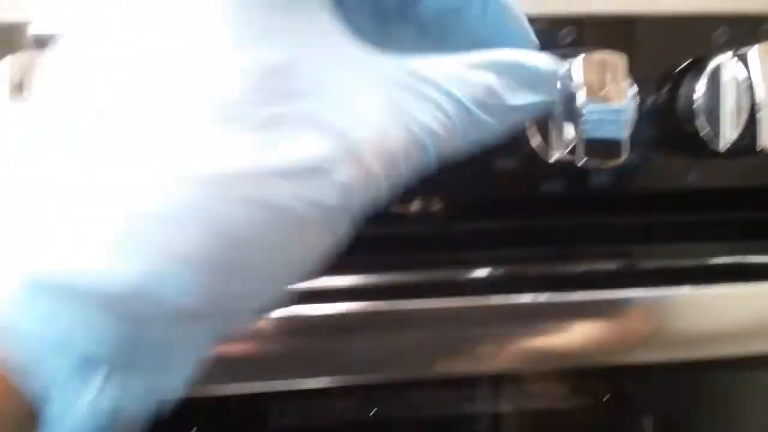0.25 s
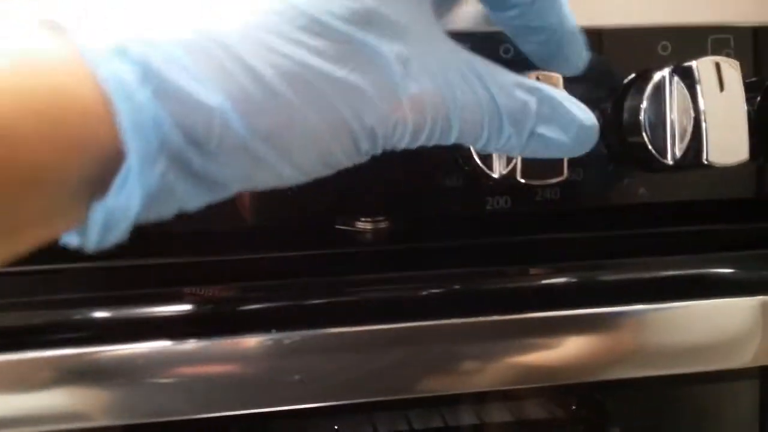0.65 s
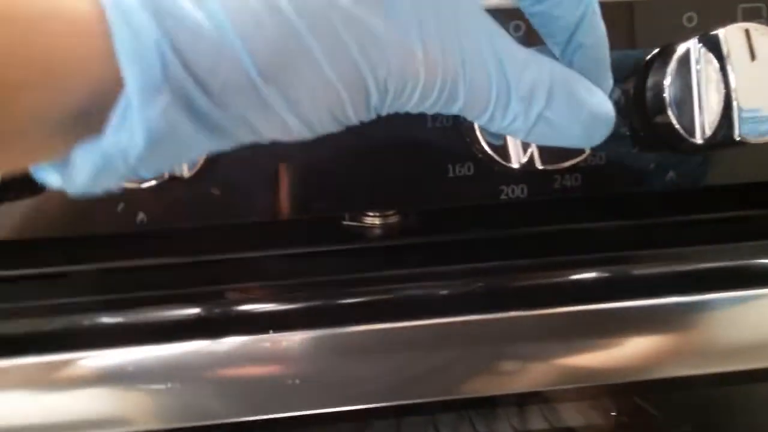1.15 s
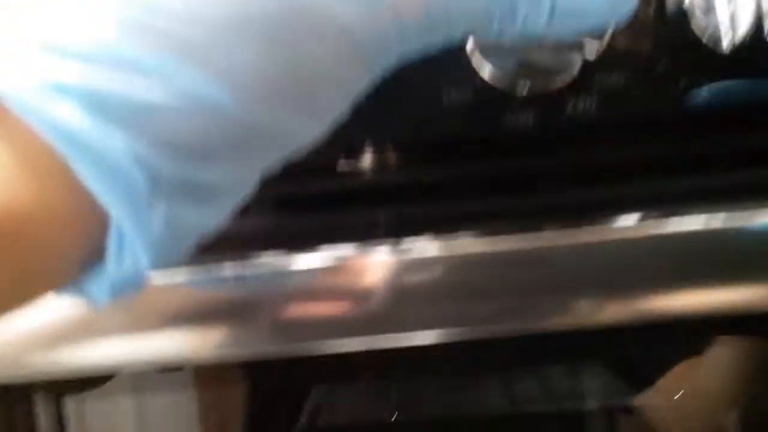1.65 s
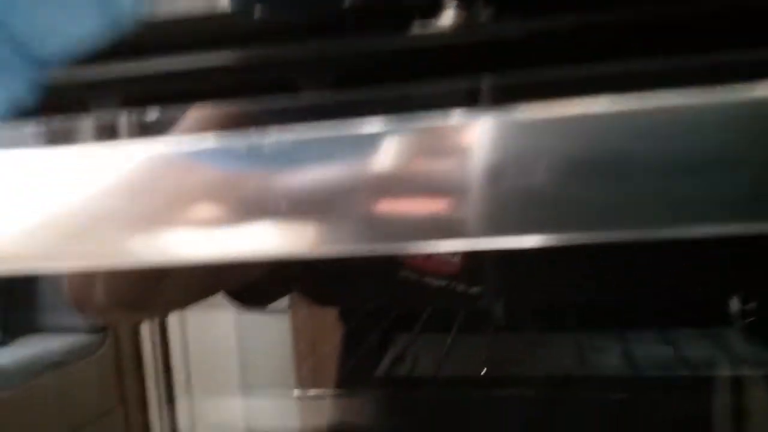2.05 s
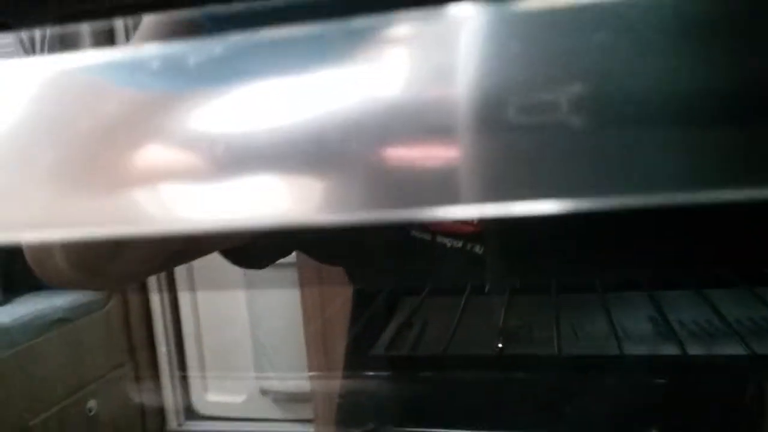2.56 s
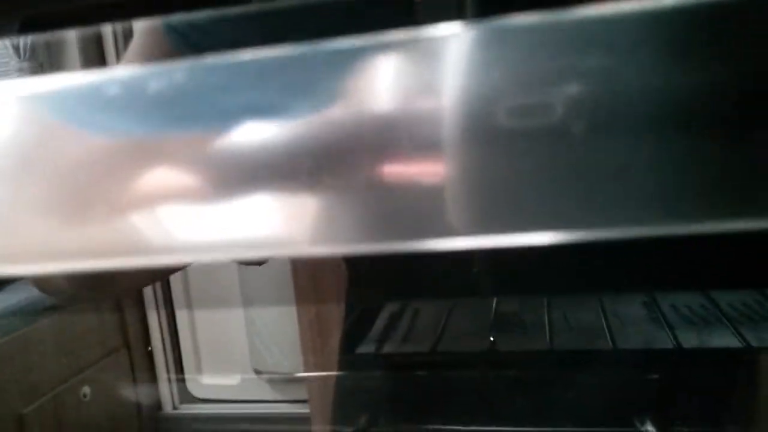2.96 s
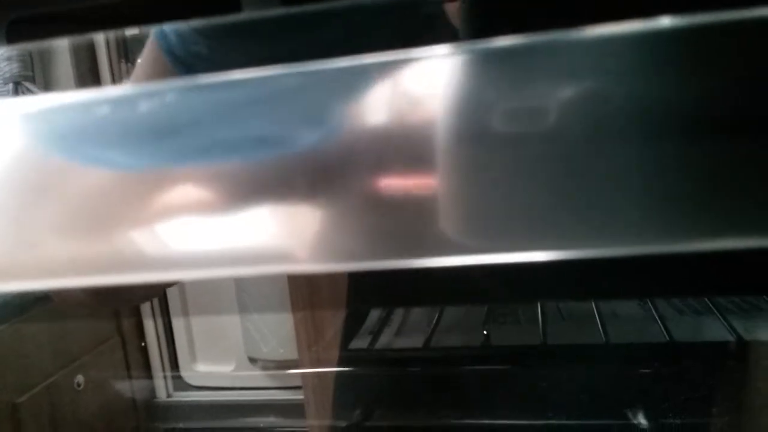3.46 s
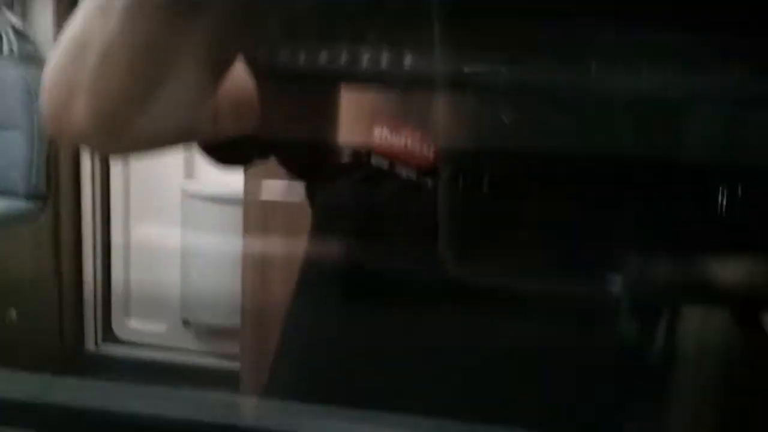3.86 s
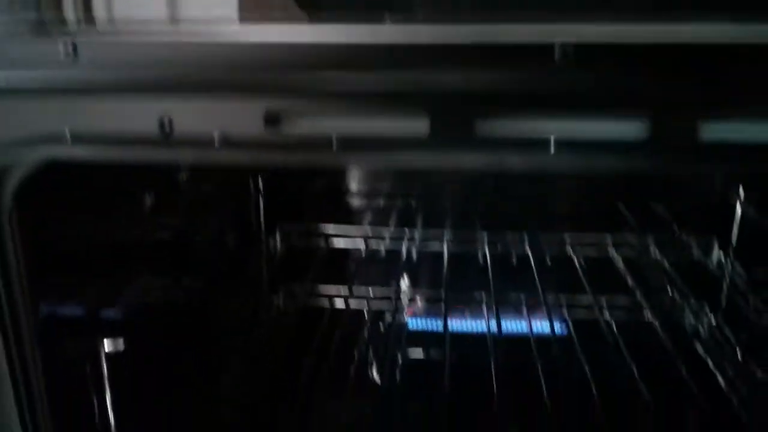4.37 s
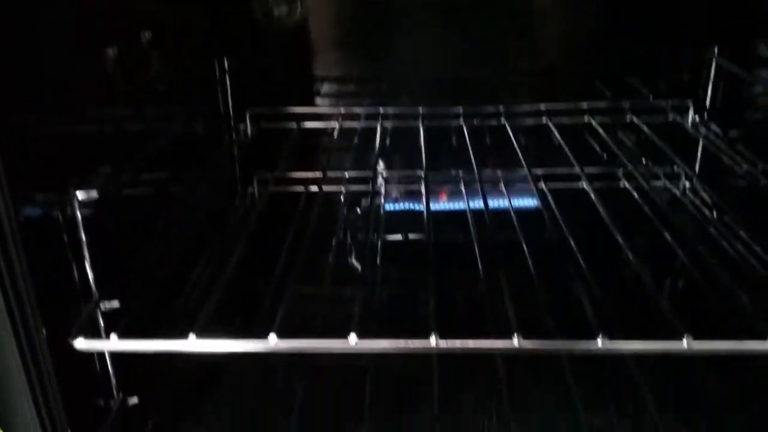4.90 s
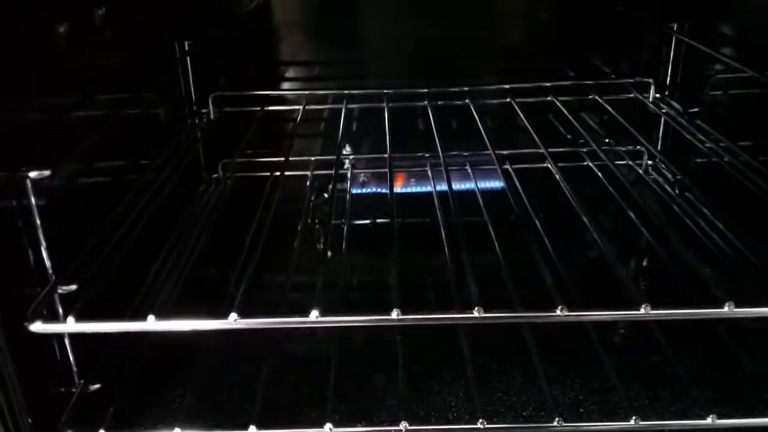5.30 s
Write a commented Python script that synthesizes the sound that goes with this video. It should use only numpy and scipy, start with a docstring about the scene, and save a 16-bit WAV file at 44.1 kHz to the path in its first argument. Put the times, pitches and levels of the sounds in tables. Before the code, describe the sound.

Light knob clicks and faint gas hiss, then five sharp igniter sparks and an oven flame burning softly as the door opens.

```python
"""Lighting a caravan gas oven

A small caravan kitchen, the microphone close to the oven door. A gloved hand pushes in and turns the
knob, the valve clacks and gas hisses. The igniter snaps five times and the burner catches: a hollow,
softly crackling rush in the oven cavity that opens up as the door comes down on its scraping spring.
Low room rumble and a thin electronic whine lie under it all."""
import sys
import numpy as np
from scipy import signal
from scipy.fft import rfft, irfft
from scipy.io import wavfile

SR = 44100
rng = np.random.default_rng(int(sys.argv[2]) if len(sys.argv) > 2 else 0)


def generate_wav(signal):
    """Clip the signal to [-1, 1] and save it as 16-bit WAV at the path in sys.argv[1]."""
    frames = np.transpose(np.atleast_2d(signal))
    scaled = np.clip(frames, -1, 1) * 32767
    pcm = np.round(scaled).astype(np.int16)
    wavfile.write(sys.argv[1], SR, pcm)


N = 244314
TIME = np.arange(N) / SR
AGE = TIME[:SR // 2]  # seconds since the onset of a short sound
VALVE_S, CATCH_S = 0.92, 2.941  # the valve opens, the gas lights

# Levels in the tables are relative, within each table.
# flame heard from outside the shut door, then through the open door: f/Hz, level/dB
FLAME_SHUT = [(35, -25.5), (62, 7), (95, -14.5), (150, -2), (210, 0), (330, -9.5), (800, -13), (1150, -25),
              (1500, -21), (2600, -26.5), (4000, -44.5), (9000, -58.5)]
FLAME_OPEN = [(35, -22.5), (48, -40.5), (64, 3.5), (88, -4), (150, 1.5), (250, -6.5), (330, -7), (500, -4),
              (800, -17.5), (1080, -20), (1300, -28), (2200, -29), (3300, -54), (10000, -50)]
# air resonances of the oven cavity: f/Hz, width/Hz, level/dB
CAVITY_MODES = [(202.6, 11.7, 12.5), (273.3, 18.3, 15), (402.5, 32, 7.5), (515, 57, 6), (626, 15.6, 15.5),
                (775.5, 27, 17.5), (845, 38, 14.5), (992, 19, 20), (1131, 40, 12.5), (1400, 25, 10.5),
                (2200, 59, 11)]
# the door coming down: t/s, share open
DOOR_TRAVEL = [(3.7, 0.045), (4.15, 0.077), (4.27, 0.51), (4.65, 0.81), (5.0, 0.88)]
# sharpest pops of the flame: t/s, level/dB
FLAME_POPS = [(4.518, -58.5), (4.6203, -58), (5.0024, -59)]
# spectra of the ignition puff and the burning jets: f/Hz, level/dB
PUFF_SPECTRUM = [(20, -11.5), (60, -11), (400, 1.5), (900, -13), (2500, -16), (6000, -40)]
JET_SPECTRUM = [(2000, 3.5), (3500, -9), (5000, -6), (6000, -4.5), (7000, -3), (8500, -18),
                (12000, -1.5), (15000, 2)]
# igniter sparks: t/s, level/dB, kitchen tail/dB
IGNITER_SPARKS = [(2.7561, -15, -0.5), (2.9368, -24, 3.5), (3.1154, -16.5, -6), (3.2924, -13.5, -6),
                  (3.4690, -12.5, -7)]
# hollower after-snaps from the cavity: t/s, level/dB
CAVITY_SNAPS = [(2.759, -17.5), (2.9396, -15.5), (2.9498, -25), (3.1186, -15)]
# spectra of a spark and an after-snap: f/Hz, level/dB
SPARK_SPECTRUM = [(200, -37.5), (700, -32.5), (1300, -18.5), (2300, -16.5), (3900, -12.5), (4500, -18),
                  (4900, -6), (7000, -5), (8400, -3), (9200, -4), (13500, -5.5), (15500, 0.5)]
SNAP_SPECTRUM = [(20, -45), (60, -2.5), (180, -1), (420, -10), (620, -9.5), (760, 1), (950, -1),
                 (1150, -9.5), (2200, -10.5), (3000, -7.5), (4000, -7), (6500, -1.5), (9000, -3),
                 (15500, 4.5)]
# resonances of the igniter's metal shield, oven walls and hinge spring: f/Hz, width/Hz, level/dB
SHIELD_MODES = [(6220, 60, 2.5), (6870, 40, -5.5), (6840, 85, 7), (8170, 18, -2)]
WALL_MODES = [(1350, 29, -10.5), (2150, 71, 10.5), (2570, 80, 4.5), (2880, 24, 3.5), (3300, 50, -18),
              (3870, 19, -3.5), (4540, 40, -33)]
SPRING_MODES = [(1380, 13, 17), (1830, 160, 8), (2395, 50, 7), (2900, 23, 17), (3020, 10, 6), (3320, 16, 2),
                (3570, 30, -6), (4730, 120, 12), (5170, 150, 7)]
# struck modes of the oven's sheet steel, front panel and trim: f/Hz, level/dB, t60/s
STEEL_MODES = [(2740, 3, 0.17), (2800, 0, 0.29), (3144, -3, 0.27), (3273, -9, 0.28)]
PANEL_MODES = [(265.8, 1.5, 0.3), (340, -9, 0.36), (430, -6.5, 0.13), (536.6, 0, 0.19), (621.5, -1, 0.11),
               (783, -6, 0.081), (961, 4.5, 0.092), (1083, -1, 0.086), (1277, -4.5, 0.081)]
TRIM_MODES = [(2250, -19, 0.044), (3040, 1, 0.043), (3350, -7, 0.07), (4640, -22, 0.022), (7400, -5, 0.036)]
# the knob bottoms out and the valve clacks open: t/s, level/dB
VALVE_CLACKS = [(0.9194, -43), (0.926, -34), (0.9277, -31.5)]
# spectra of that clack and of the hissing gas: f/Hz, level/dB
CLACK_SPECTRUM = [(500, -24), (1900, -12), (2800, -1.5), (3700, -9), (4900, -2), (5600, -6), (5950, 6),
                  (6400, -5.5), (7200, -12), (8500, -6), (9800, -14), (11000, -8), (14000, -2),
                  (15500, -1.5)]
GAS_SPECTRUM = [(150, -5), (400, 11), (1050, 11), (1300, -5.5), (2100, 1), (3000, -25.5), (4200, -86),
                (5200, -9.5), (6400, -41.5), (8000, -99.5), (15000, -4.5)]
# contacts of knob and door: t/s, level/dB, centre f/Hz, width/octaves, t60/s
CONTACTS = [(0.0576, -45, 6600, 0.48, 0.0069), (0.0797, -41.5, 3360, 1.5, .017),
            (0.0881, -44, 3460, 3.1, .011), (0.2543, -46, 4900, 0.57, 0.023),
            (0.3866, -40.5, 1600, 2.3, 0.11), (.7732, -54, 5230, .6, .04), (.8932, -36, 2200, 1.3, .02),
            (0.898, -42.5, 2360, 1.5, 0.42), (0.9196, -31, 1209, 1.2, .055), (1.2314, -44, 2200, 2, .025),
            (1.2711, -39.5, 2200, 1.9, 0.034), (1.6008, -39.5, 2900, 0.89, .022),
            (1.7294, -35, 2000, 1.06, 0.073), (1.752, -45.5, 5900, 1, .027),
            (3.5902, -46.5, 8050, 3.6, .03), (5.4663, -27.5, 2900, 1.24, 0.054),
            (5.4977, -44, 4480, 1.44, .04)]
# contacts that ring the trim: t/s, level/dB
TRIM_PINGS = [(1.2333, -45), (1.2706, -41), (1.6004, -39), (1.727, -52), (5.4673, -38)]
# blows on the front panel: t/s, ring level/dB, thud level/dB
PANEL_KNOCKS = [(0.39, -54.5, -60), (.921, -42.5, -65), (0.93, -39.5, -50), (.9590, -53, -39),
                (1.272, -53.5, -74), (1.731, -56, -43.5)]
# the front panel rings low, then the knob gives a faint high squeak: t/s, level/dB, f/Hz, t60/s
RING_AND_SQUEAK = [(.508, -47.5, 258, 0.95), (.688, -58.5, 3400, 0.15)]
# slides of the glove on the knob, scrapes of the hinge spring: t/s, length/s, level/dB
GLOVE_STROKES = [(.3, 0.065, -61), (.52, 0.37, -70.5), (1.655, 0.086, -56)]
HINGE_STROKES = [(3.65, 0.1, -68), (3.91, .04, -67), (4.0, 0.053, -63.5), (4.2, 0.24, -69.5)]
# spectra of the oven's thud, the glove's rustle and the hinge's scrape: f/Hz, level/dB
THUD_SPECTRUM = [(20, -27), (40, -9), (65, -5), (130, -7.5), (400, -13.5), (1200, -24.5), (4000, -51.5)]
GLOVE_SPECTRUM = [(500, 17.1), (3000, 5), (8000, 8), (10000, 0.5), (15000, 11)]
SCRAPE_SPECTRUM = [(700, -32), (1500, 7), (3000, -1.5), (5200, -5), (7500, -37), (14000, -4.5)]
# room tone of the kitchen: f/Hz, level/dB
ROOM_SPECTRUM = [(20, -47.5), (36, -41.5), (52, -4), (70, 1.5), (100, -1.5), (160, -6.5), (260, -10),
                 (330, -18), (900, -19), (1500, -25.5), (3500, -40), (8000, -42.5), (12000, -40.5),
                 (15000, -45.5)]
# resonances of the microphone port: f/Hz, width/Hz, level/dB
MIC_PORT_MODES = [(6220, 515, 12), (5930, 390, 6.5)]


def burner():
    """Turbulent flame in the oven cavity: muffled and humming behind the door, fuller once it is open."""
    shut = unit(colour(noise(FLAME_SHUT), humps(CAVITY_MODES)))
    opened = unit(colour(noise(FLAME_OPEN), humps(CAVITY_MODES)))
    blend = np.sqrt(1 - exposure()) * shut + np.sqrt(exposure()) * opened
    flutter_db = 1.3 * wander(24.5)
    roar = flame_strength() * amp(3.5 + flutter_db) * blend
    shut_hum = amp(-45.5) * alight() * swell(3.157, 0.62, attack_s=0.09, release_s=0.064)
    hum = (shut_hum + amp(-48) * opening()) * narrow(226, width_hz=23)  # a low mode of the cavity
    draught = alight() * amp(-46.5 - 18 * (1 - opening())) * narrow(66.1, width_hz=7.2)
    return roar + hum + draught


def catch(push_db=-33, puff_db=-39):
    """The pooled gas lights with one soft push of air and a short puff."""
    progress = AGE / 0.0048
    push = amp(push_db) * (1 - progress) * np.exp(-progress) * onset(0.00033)
    puff = colour(scatter() * decay(puff_db, t60=0.039), slope(PUFF_SPECTRUM))
    out = np.zeros(N)
    add(out, CATCH_S, push + puff)
    return out


def crackle(spray_db=-22.5, pop_hz=5990):
    """The flame spits a fine spray of tiny pops at mixed pitches; a few stand out with the door open."""
    def pop(centre_hz):
        burst = crack(scatter(), direct_db=3, near_t60=0.035, room_db=-13, room_t60=0.11)
        return colour(burst, around(centre_hz, octaves=0.8))
    sizes = sparse(per_s=130, spread_db=3)
    pitches_hz = np.geomspace(2300, 6500, num=8)
    kinds = rng.integers(0, len(pitches_hz), N)
    spray = sum(signal.fftconvolve(sizes * (kinds == k), pop(hz))[:N] for k, hz in enumerate(pitches_hz))
    out = flame_strength() * amp(spray_db) * unit(spray)
    out += amp(-66.5) * signal.fftconvolve(opening() * sparse(per_s=10), pop(pop_hz))[:N]
    for s, db in FLAME_POPS:
        add(out, s, amp(db) * pop(pop_hz))
    return out


def fizz():
    """The burning jets fizz, reaching the microphone mostly through the open door."""
    return amp(-16) * flame_strength() * exposure() * noise(JET_SPECTRUM)


def alight(spread_s=0.33):
    """Share of the burner alight as the flame spreads along it, 0-1."""
    return 1 - np.exp(-np.maximum(TIME - CATCH_S, 0) / spread_s)


def opening():
    """How far the door is open, 0-1."""
    return np.clip(np.interp(TIME, *np.transpose(DOOR_TRAVEL)), 0, 1)


def exposure(door_leak=0.097):
    """Share of the flame's sound that comes straight out of the oven, 0-1."""
    return door_leak + (1 - door_leak) * opening()


def flame_strength():
    """The flame grows as it spreads and sounds closer as the door opens."""
    return alight() * amp(-51 + 6 * opening())


def igniter(path_change=0.68):
    """Each spark takes partly the same echo paths; the moving hand changes the rest."""
    out, same = np.zeros(N), scatter()
    for s, db, tail_db in IGNITER_SPARKS:
        paths = np.sqrt(1 - path_change ** 2) * same + path_change * scatter()
        add(out, s, amp(db) * crack(paths, direct_db=4, near_t60=0.084, room_db=tail_db, room_t60=0.14))
    return colour(colour(out, slope(SPARK_SPECTRUM)), humps(SHIELD_MODES))


def after_snaps(steel_db=-34):
    """Hollower cracks just after the first three sparks, ringing on in the oven's steel walls."""
    cracks, steel = np.zeros(N), np.zeros(N)
    for s, db in CAVITY_SNAPS:
        snap = crack(scatter(), direct_db=7, near_t60=0.018, room_db=-1.5, room_t60=0.14)
        add(cracks, s, amp(db) * snap)
        add(steel, s, amp(db + steel_db) * ring(STEEL_MODES))
    return colour(colour(cracks, slope(SNAP_SPECTRUM)), humps(WALL_MODES)) + steel


def valve():
    """Metal meets metal at the end of the knob's travel: a quick, bright, ringing clack."""
    out = np.zeros(N)
    for s, db in VALVE_CLACKS:
        clack = crack(scatter(), direct_db=-4, near_t60=0.034, room_db=-6.5, room_t60=0.11)
        add(out, s, amp(db + 2) * clack)
    return colour(out, slope(CLACK_SPECTRUM))


def clicks():
    """Small hard contacts of knob and door, each with its own pitch; some set the trim pinging."""
    out = np.zeros(N)
    for s, db, centre_hz, octaves, t60 in CONTACTS:
        tick = crack(scatter(), direct_db=5, near_t60=t60, room_db=-11.5, room_t60=0.23)
        add(out, s, amp(db - 9.5) * colour(tick, around(centre_hz, octaves)))
    for s, db in TRIM_PINGS:
        add(out, s, amp(db - 10.5) * ring(TRIM_MODES))
    return out


def panel():
    """The sheet-metal front rings at every blow while the whole oven thuds under it."""
    out = np.zeros(N)
    for s, db, thud_db in PANEL_KNOCKS:
        thud = colour(scatter() * decay(thud_db, t60=0.25), slope(THUD_SPECTRUM))
        add(out, s, (amp(db) * ring(PANEL_MODES) + thud) * onset(0.00047))
    return out


def hand(ticks_end_s=2.2):
    """The rubber glove rustles and ticks; the front panel rings low, then the knob squeaks faintly."""
    rub = strokes(GLOVE_STROKES, attack_s=0.024, release_s=0.033) * amp(wander(90))
    out = rub * noise(GLOVE_SPECTRUM)
    tick = crack(scatter(), direct_db=2.5, near_t60=0.022, room_db=-10.5, room_t60=0.14)
    tick = colour(tick, around(4200, octaves=2.7))
    fidgets = sparse(per_s=11) * (TIME < ticks_end_s)
    out += amp(-69) * signal.fftconvolve(fidgets, tick)[:N]
    for s, db, hz, t60 in RING_AND_SQUEAK:
        add(out, s, decay(db, t60) * onset(0.0051) * np.sin(2 * np.pi * hz * AGE))
    return out


def gas(turn_s=1.3, rise_db=5.5):
    """Gas hisses louder as the knob turns and fades as it lights; the open door lets the jet be heard."""
    turned = np.clip((TIME - VALVE_S) / turn_s, 0, 1)
    flow = (TIME > VALVE_S) * amp(-65.5 + rise_db * (turned - 0.5))
    unlit = flow * (1 - alight()) ** 2
    through_door = amp(-62) * opening() ** 2
    return (unlit + through_door) * noise(GAS_SPECTRUM)


def hinge():
    """Uneven stick and slip rings the hinge spring as the door swings down."""
    slip = amp(2.5 * wander(49))
    grip = strokes(HINGE_STROKES, attack_s=0.01, release_s=0.037) * slip
    return colour(grip * noise(SCRAPE_SPECTRUM), humps(SPRING_MODES))


def whine(hz=14018):
    """A thin electronic whine; its level dips briefly around 3.6 s."""
    pitch_hz = hz + 2.4 * wander(9.5)
    tone = np.sqrt(2) * np.sin(2 * np.pi * np.cumsum(pitch_hz) / SR)
    dip_db = 4 * np.exp(-((TIME - 3.6) / 0.6) ** 2)
    return amp(-53.5 - dip_db) * tone


def room_tone():
    """Low kitchen rumble and faint hiss, swelling while the hand presses on the oven."""
    pressing = swell(0.3, 2.4, attack_s=0.45, release_s=0.56)
    return amp(-54 + 3 * pressing) * noise(ROOM_SPECTRUM)


def crack(paths, direct_db, near_t60, room_db, room_t60):
    """A sharp front, quick echoes between metal panels, then the short tail of the kitchen."""
    front = amp(direct_db) * np.exp(-AGE / 0.0006)
    near, room = decay(0, near_t60), decay(room_db, room_t60)
    return paths * np.sqrt(front ** 2 + near ** 2 + room ** 2)


def scatter(size=256):
    """Dense reflections of even strength and random phase."""
    spectra = signal.stft(rng.standard_normal(len(AGE)), nperseg=size)[2]
    phases = spectra / (abs(spectra) + 1e-12)
    return unit(signal.istft(phases, nperseg=size)[1][:len(AGE)])


def ring(modes):
    """Struck modes, dying away."""
    return sum(decay(db, t60) * np.sin(2 * np.pi * (hz * AGE + rng.random())) for hz, db, t60 in modes)


def noise(points):
    """Steady noise with the given spectrum."""
    return unit(colour(rng.standard_normal(N), slope(points)))


def narrow(hz, width_hz):
    """Turbulence in one resonance: a fuzzy, wavering tone."""
    f = np.fft.rfftfreq(N, 1 / SR)
    return unit(irfft(rfft(rng.standard_normal(N)) / (1 + ((f - hz) / width_hz) ** 2) ** 1.5, N))


def wander(cutoff_hz):
    """Smooth random motion with an RMS of 1."""
    hz = np.fft.rfftfreq(N, 1 / SR)
    return unit(irfft(rfft(rng.standard_normal(N)) / (1 + (hz / cutoff_hz) ** 4), N))


def sparse(per_s, spread_db=1.2):
    """Impulses at random moments, a few larger than the rest."""
    sizes = amp(spread_db * np.minimum(rng.exponential(1, N), 3))
    return sizes * (rng.random(N) < per_s / SR)


def strokes(rows, attack_s, release_s):
    """One swell for each stroke of a rubbing contact."""
    return sum(amp(db) * swell(start, length, attack_s, release_s) for start, length, db in rows)


def swell(start_s, length_s, attack_s, release_s):
    """Linear attack, hold, exponential release."""
    attack = np.clip((TIME - start_s) / attack_s, 0, 1)
    return attack * np.exp(-np.maximum(TIME - start_s - length_s, 0) / release_s)


def onset(rise_s):
    return 1 - np.exp(-AGE / rise_s)


def decay(db, t60):
    return amp(db - 60 * AGE / t60)


def colour(x, gain, size=8192):
    """Causal filter shaped like the given gain; it keeps the power of white noise."""
    hz = abs(np.fft.fftfreq(size, 1 / SR))
    log_gain = np.log(np.maximum(gain(hz), 1e-5))
    minimum_phase = np.exp(np.conj(signal.hilbert(log_gain)))
    taps = np.fft.ifft(minimum_phase).real[:size // 2]
    return signal.fftconvolve(x, taps / np.linalg.norm(taps))[:len(x)]


def slope(points):
    """Gain against frequency, through points of f/Hz, level/dB."""
    f, db = np.transpose(points)
    return lambda hz: amp(np.interp(np.log(hz + 1), np.log(f), db))


def humps(modes):
    """Gain against frequency: resonances standing out of a flat response."""
    def gain(hz):
        peaks = sum(amp(db) ** 2 / (1 + (2 * (hz - f) / width) ** 2) for f, width, db in modes)
        return np.sqrt(1 + peaks)
    return gain


def around(centre_hz, octaves):
    """Gain against frequency: one broad hill."""
    return lambda hz: 1 / (1 + (np.log2((hz + 1) / centre_hz) / octaves) ** 2) ** 1.84


def amp(db):
    return 10 ** (np.asarray(db) / 20)


def unit(x):
    return x / np.sqrt(np.mean(x ** 2) + 1e-20)


def add(mix, s, sound):
    part = mix[max(round(s * SR), 0):][:len(sound)]
    part += sound[:len(part)]


def scene():
    """Knob, gas, sparks, flame and door at close range, in mono, over the kitchen's room tone."""
    knob = clicks() + valve() + panel() + hand()
    flame = catch() + burner() + fizz() + crackle()
    return (knob + gas() + igniter() + after_snaps() + flame + hinge() + whine() + room_tone())[None]


def record(dry, ceiling=0.6, edge_hz=15800):
    """The microphone port rings near 6 kHz, the tallest peaks are rounded off and the top is cut."""
    at_mic = amp(0.37) * colour(dry[0], humps(MIC_PORT_MODES))
    rounded = ceiling * np.tanh(at_mic / ceiling)
    lowpass = signal.firwin(401, edge_hz, window=("kaiser", 9), fs=SR)
    return signal.oaconvolve(rounded, lowpass, "same")[None]


dry = scene()
out = record(dry)
generate_wav(out)
```